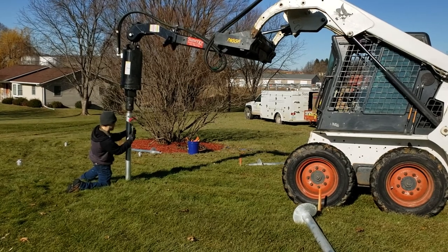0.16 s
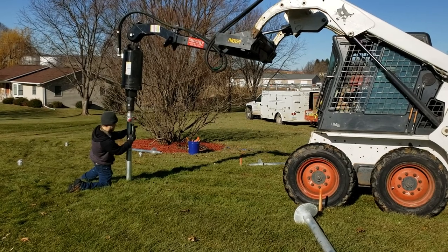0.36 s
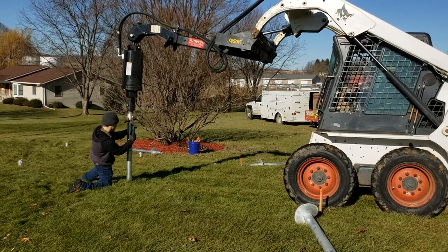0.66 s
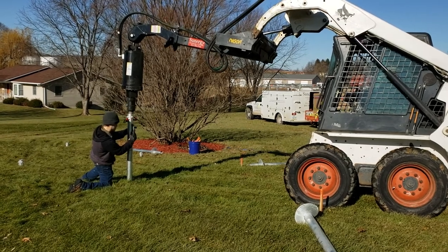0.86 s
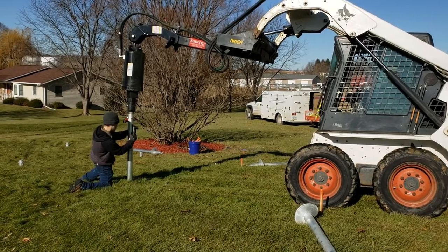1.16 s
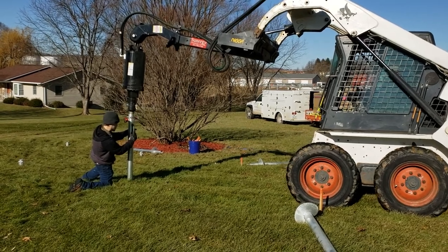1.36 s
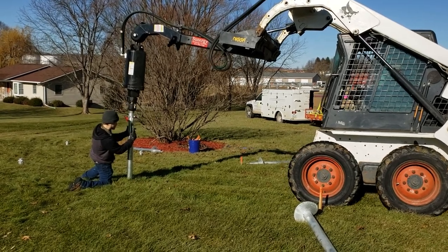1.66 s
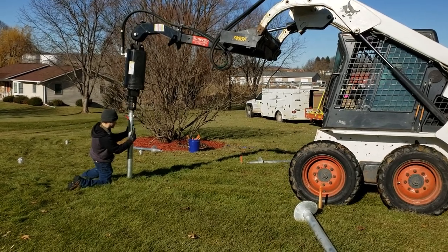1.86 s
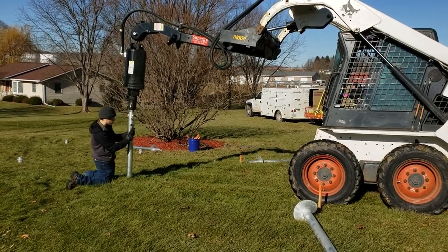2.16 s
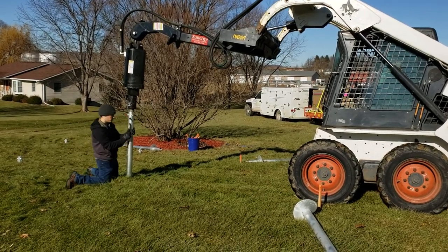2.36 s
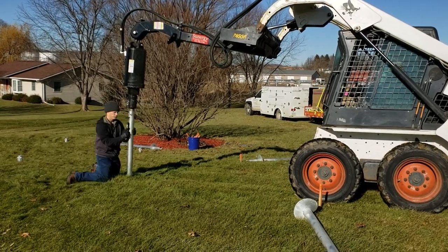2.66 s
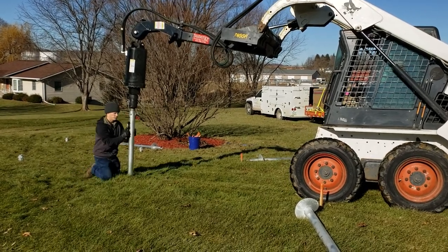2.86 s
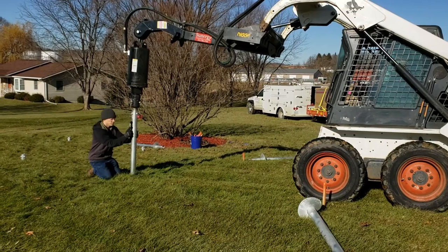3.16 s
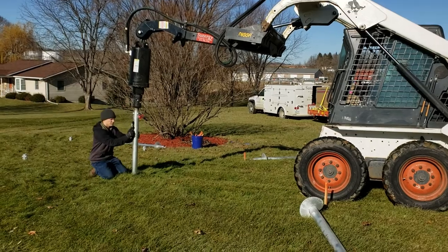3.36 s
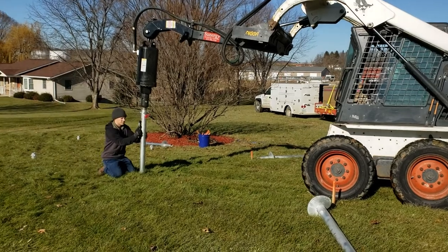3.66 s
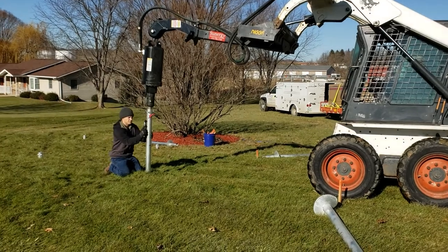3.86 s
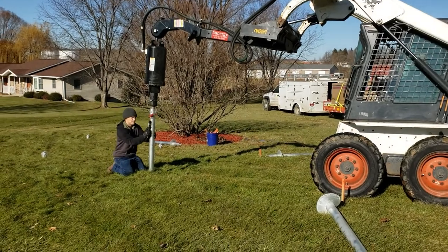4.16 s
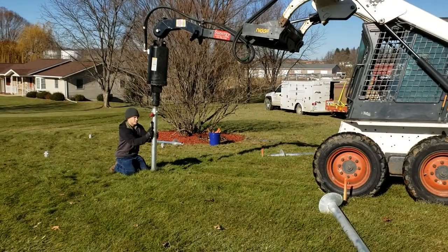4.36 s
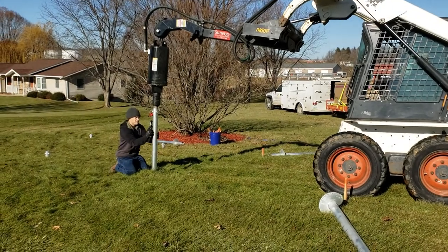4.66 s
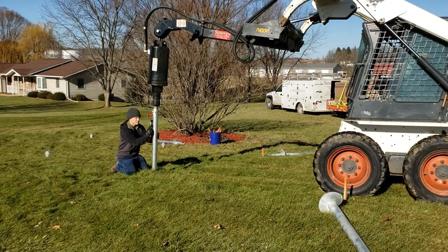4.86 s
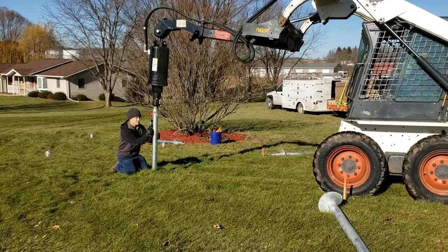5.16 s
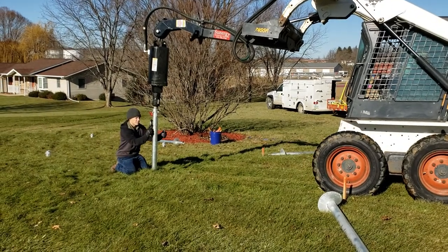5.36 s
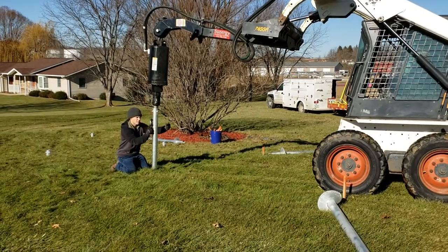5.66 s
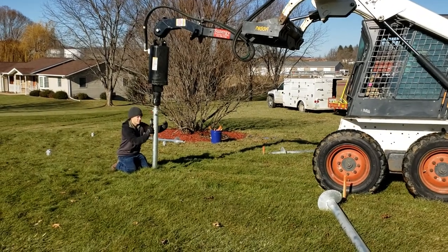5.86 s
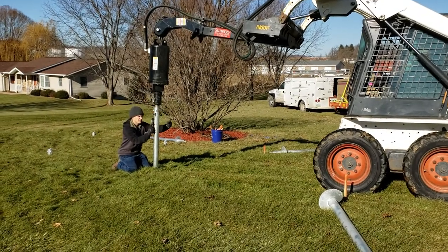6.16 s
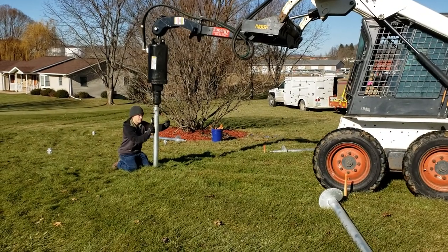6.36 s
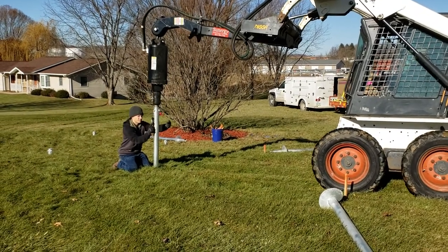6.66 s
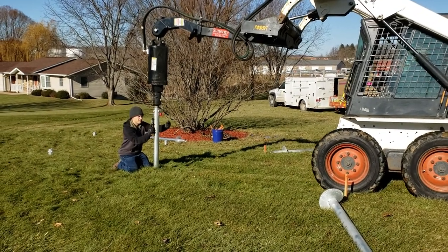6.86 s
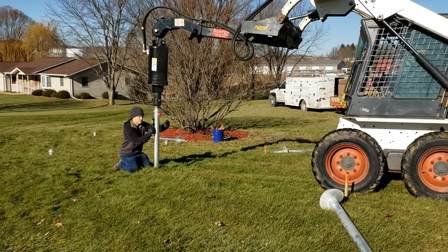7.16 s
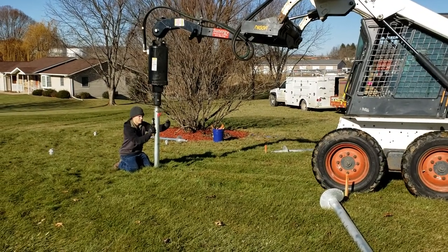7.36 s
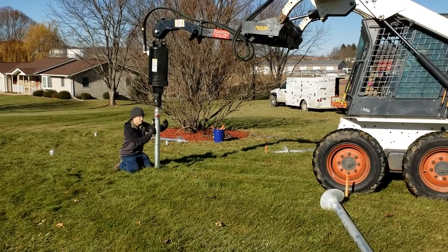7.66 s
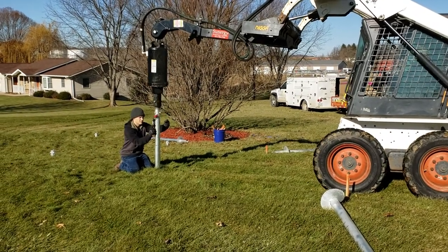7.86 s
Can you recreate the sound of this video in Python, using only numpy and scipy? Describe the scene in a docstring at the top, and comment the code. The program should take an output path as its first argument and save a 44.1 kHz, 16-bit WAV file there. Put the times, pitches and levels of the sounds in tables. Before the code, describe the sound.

A small diesel loader drones steadily while driving a hydraulic auger, with clatter, a growing metallic rattle and light wind rumble.

```python
"""Skid-steer loader on a lawn

A four-cylinder diesel, off to the right, holds about 2180 rpm to drive a hydraulic auger.
The exhaust booms at the firing rate, a panel barks once per cycle, the block clatters, the fan hums.
Oil hisses in the valves. At 3.2 s the tone shifts: a high hiss drops in pitch, a metallic rattle grows.
Wind gusts rumble on the camera's two microphones."""
import sys
import numpy as np
from scipy.fft import rfft, irfft, next_fast_len
from scipy.io import wavfile
from scipy.ndimage import map_coordinates

SR = 44100
rng = np.random.default_rng(int(sys.argv[2]) if len(sys.argv) > 2 else 0)


def store_pcm(level_fs):
    """Save levels as 16-bit WAV."""
    pcm = np.round(np.clip(level_fs, -1, 1) * 32767).astype(np.int16)
    wavfile.write(sys.argv[1], SR, np.atleast_2d(pcm).T)


N = 352800
TIME_S = np.arange(N) / SR
COLOUR_SHIFT_S = 3.2  # the machine's tone changes

# machine noise, left to right: f/Hz, coherence
MACHINE_COHERENCE = [(100, 0.71), (600, 1), (1500, 0.74), (2500, 0.86), (3300, 0.5), (5000, 0.7),
                     (6500, 0.27), (14000, 0.29)]


def amp(db):
    return 10 ** (np.asarray(db) / 20)


def unit(x):
    return x / np.sqrt(np.mean(x ** 2) + 1e-20)


def over_log_f(points, hz):
    f, values = np.transpose(points)
    return np.interp(np.log(hz + 1), np.log(f + 1), values)


def over_time(points):
    return np.interp(TIME_S, *np.transpose(points))


def ramp(middle_s, length_s):
    return .5 + .5 * np.tanh(4 * (TIME_S - middle_s) / length_s)


def wobble(rate_hz):
    """Smooth random curve through unit-variance knots."""
    knots = rng.standard_normal(int(N * rate_hz / SR) + 4)
    grid = np.arange(0, N, 64)
    return np.interp(np.arange(N), grid, map_coordinates(knots, [grid * rate_hz / SR]))


def filtered(x, response):
    """Apply a complex frequency response."""
    size = next_fast_len(N + SR // 2)
    return irfft(rfft(x, size) * response(np.fft.rfftfreq(size, 1 / SR)), size)[..., :N]


def resonance(hz, centre_hz, width_hz):
    return 1j * hz * width_hz / (centre_hz ** 2 - hz ** 2 + 1j * hz * width_hz)


def resonate(x, modes):
    """Parallel modes, each squared to keep the valleys between them deep."""
    return filtered(x, lambda hz: sum(amp(db) * resonance(hz, f, width) ** 2 for f, width, db in modes))


def stereo(pair, spectrum, coherence=MACHINE_COHERENCE):
    """Two independent noises to coloured, partly coherent left and right; rms 1."""
    def response(hz):
        angle = np.arccos(np.clip(over_log_f(coherence, hz), -1, 1)) / 2
        return amp(over_log_f(spectrum, hz)) * [np.cos(angle), np.sin(angle)]
    mid, side = filtered(pair, response)
    return unit(np.array([mid + side, mid - side]))


def harmonics(turns, orders):
    """Harmonics of a rotation; 0 dB is rms 1."""
    return np.sqrt(2) * sum(amp(db) * np.cos(2 * np.pi * round(k) * turns) for k, db in orders)


def cyclic_noise(cycle, share, size=2400):
    """Two noises; a share of their power repeats every engine cycle."""
    patterns = rng.standard_normal((2, size))
    repeating = np.array([map_coordinates(row, [cycle % 1 * size], mode="grid-wrap") for row in patterns])
    return np.sqrt(share) * repeating + np.sqrt(1 - share) * rng.standard_normal((2, N))


def exhaust(cycle, flutter_db):
    """The silencer passes the low firing harmonics; unequal cylinders add weak lines between."""
    # exhaust lines: cycle order (4 = firing rate), level/dB
    orders = [(3, -34), (4, 0.5), (5, -27.5), (8, -12.5), (11, -48.5), (12, -28), (13, -38), (15, -29.5)]
    return harmonics(cycle, orders) * amp(flutter_db * wobble(25))


def panel_bark(cycle, at_cycles, width_cycles, scatter_db, jitter_rad, rebound_db, buzz_db):
    """Shaken once a cycle, a panel bursts on its main mode, rebounds and buzzes in between."""
    # panel modes, main first: f/Hz, width/Hz, level/dB
    modes = [(557.3, 89, 0), (654, 19, -3), (810.6, 36, -9.5)]
    count = cycle - at_cycles + 1.5
    strength, phase = rng.standard_normal((200, 2))[count.astype(int)].T
    offset_cycles = count % 1 - .5
    offset_s = offset_cycles / (np.gradient(cycle) * SR)
    burst = np.exp(-.5 * (offset_cycles / width_cycles) ** 2)
    rebound = amp(rebound_db) * np.exp(-.5 * ((offset_cycles - .27) / .023) ** 2)
    envelope = (burst + rebound) * amp(scatter_db * strength)
    note = envelope * np.sin(2 * np.pi * modes[0][0] * offset_s + jitter_rad * phase)
    buzz = resonate(rng.standard_normal(N), modes) * (1 - .5 * burst)  # gives way under hard drive
    return unit(note) + amp(buzz_db) * unit(buzz)


def fan(firing, flutter_db, waver_turns, blades_per_firing=5.338):
    """The belt-driven fan hums in step with the crank; turbulence makes it waver."""
    # fan hum: blade-rate order, level/dB
    orders = [(1, -2.5), (2, -11)]
    blade_turns = blades_per_firing * firing + waver_turns * wobble(24)
    return harmonics(blade_turns, orders) * amp(flutter_db * wobble(8.6))


def block_clatter(firing, depth):
    """Combustion roars through the block, swelling slightly at each firing."""
    # block noise: f/Hz, density/dB
    spectrum = [(120, 4), (220, 3), (340, -1.5), (680, 3.5), (920, -3.5), (1400, -4), (2050, -1),
                (2600, -10.5), (2900, -11.5), (3200, -18.5), (3850, -13.5), (5200, -17), (6600, -31.5),
                (9000, -41)]
    swell = 1 + depth * np.cos(2 * np.pi * firing)
    return stereo(rng.standard_normal((2, N)) * swell, spectrum)


def valve_ticks(cycle, decay_cycles, scatter_db):
    """Valves and injectors tick with a similar ring every cycle."""
    # ticks: position/cycles, level/dB
    ticks = [(0.081, -1.5), (0.219, 0), (.35, 3), (.41, -4.5), (.64, 1), (0.741, -1.5), (0.829, -16),
             (.91, 0.5)]
    # ring of the ticks: f/Hz, density/dB
    spectrum = [(700, -19.5), (1050, 3.5), (1450, -5), (2100, -0.5), (2600, -9), (3200, -15), (4500, -14),
                (6600, -25.5), (9000, -53.5)]
    envelope = 0
    for at_cycles, db in ticks:
        count = cycle - at_cycles + 1
        tick_db = db + scatter_db * rng.uniform(-2.5, 1, size=200)[count.astype(int)]
        envelope = envelope + amp(tick_db) * np.exp(-(count % 1) / decay_cycles)
    return stereo(cyclic_noise(cycle, share=0.74) * envelope, spectrum)


def sheet_metal(x):
    """Ringing covers and guards lift or cut narrow bands."""
    # sheet-metal modes: f/Hz, width/Hz, gain/dB
    modes = [(1444, 54, 3.5), (1727, 66, -6.5), (2180, 83, 1), (2780, 53, 9), (4900, 180, 3),
             (5640, 260, 4.5)]
    return filtered(x, lambda hz: 1 + sum((amp(db) - 1) * resonance(hz, f, bw) for f, bw, db in modes))


def ringing_rattle(shift, before_db, after_db, contacts_per_s, scatter_db):
    """Small, uneven contacts ring metallically at 2-4 kHz, louder after the colour shift."""
    # rattle modes: f/Hz, width/Hz, level/dB
    modes = [(2054, 120, -3.5), (2318, 210, -1.5), (2793, 70, -1.5), (3865, 130, -8.5)]
    level_db = before_db + (after_db - before_db) * shift + 0.85 * wobble(12)
    contacts = (rng.random(N) < contacts_per_s / SR) * rng.choice([-1, 1], size=N)
    strength = amp(scatter_db * rng.standard_normal(N).clip(-2, 2))
    return amp(level_db) * unit(resonate(contacts * strength, modes))


def gear_whine(cycle, flutter_db, waver_cycles):
    """Gears and pump whine in crank-locked lines, each fading on its own."""
    # whine lines: cycle order, level/dB
    orders = [(44, -3), (47, -7), (68, -3), (75, -1), (77, -15.5), (81, 0), (93, -9.5), (96, 2), (108, -8),
              (115, -4)]
    return sum(harmonics(cycle + waver_cycles * wobble(7.7), [line]) * amp(flutter_db * wobble(4.6))
               for line in orders)


def early_bands(shift, swell_s, start_db, swell_db, end_db):
    """Machine noise near 1.4 and 4.3 kHz swells, then fades at the colour shift."""
    # noise bands: f/Hz, density/dB
    spectrum = [(800, -17.5), (1250, 6.5), (1450, 14), (1800, -4.5), (2300, -24), (3300, -16), (4300, 1),
                (4900, -2.5), (6200, -32), (9000, -31)]
    early_db = start_db + (swell_db - start_db) * ramp(swell_s, length_s=.4)
    level_db = early_db + (end_db - early_db) * shift
    return amp(level_db) * stereo(rng.standard_normal((2, N)), spectrum)


def oil_hiss(flutter_db):
    """Oil hisses through the valves and the auger motor."""
    # fine hiss: f/Hz, density/dB
    spectrum = [(3000, -37), (6500, -18), (8000, -6), (9300, -2.5), (10300, -5), (11800, 3), (14200, 3),
                (15700, 3.5)]
    return stereo(rng.standard_normal((2, N)) * amp(flutter_db * wobble(60)), spectrum)


def high_hiss(shift, before_hz, after_hz, width_hz, peak_db, fade_db_per_s):
    """A narrow hiss, loudest at the colour shift, where it crossfades to a lower band."""
    def band(centre_hz):
        noise = rng.standard_normal((2, N))
        return unit(filtered(noise, lambda hz: 1 / (1 + (2 * (hz - centre_hz) / width_hz) ** 2)))
    level_db = peak_db - fade_db_per_s * np.abs(TIME_S - COLOUR_SHIFT_S)
    return amp(level_db) * (np.sqrt(1 - shift) * band(before_hz) + np.sqrt(shift) * band(after_hz))


def wind_strength(fresh_db, light_db, flutter_offset_db):
    """Rumble and flutter amplitudes: bell-shaped gusts over an unsteady, easing breeze."""
    # gusts: peak t/s, length/s, rumble/dB, flutter/dB
    gusts = [(0.043, 0.051, -27, -43.5), (0.17, .07, -25.5, -34.5), (0.33, .06, -15.5, -30),
             (0.445, .09, -29.5, -28.5), (0.557, .06, -23, -32.5), (1.435, 0.16, -25.5, -31.5),
             (1.568, 0.087, -19.5, -32), (1.655, .07, -20.5, -29), (2.385, .07, -27, -39.5),
             (2.786, 0.087, -28, -51), (3.048, .17, -23, -36.5), (4.652, 0.093, -28.5, -41),
             (5.895, 0.24, -27.5, -53.5), (6.032, 0.11, -26, -44), (6.524, 0.088, -24.5, -44),
             (6.768, 0.27, -28.5, -41.5)]
    breeze_db = fresh_db + (light_db - fresh_db) * ramp(middle_s=2.2, length_s=1.4) + 1.1 * wobble(9)
    power = amp([breeze_db, breeze_db + flutter_offset_db]) ** 2
    for peak_s, length_s, rumble_db, flutter_db in gusts:
        bell = np.exp(-2 * (2 * (TIME_S - peak_s) / length_s) ** 2)
        power = power + amp([[rumble_db], [flutter_db]]) ** 2 * bell
    return np.sqrt(power)


def wind(rumble, flutter, lump_db):
    """Eddies hit each microphone as a low rumble; the sharpest flutter higher up."""
    # rumble: f/Hz, density/dB
    rumble_spectrum = [(10, -33), (22, -26), (45, -0.5), (70, 3.5), (110, -1.5), (170, -8.5), (300, -23.5),
                       (800, -45), (2500, -79.5)]
    # flutter: f/Hz, density/dB
    flutter_spectrum = [(60, -23.5), (160, 3.5), (260, 0), (460, -5), (700, -13.5), (1100, -17.5),
                        (3000, -53.5)]
    # wind, left to right: f/Hz, coherence
    coherence = [(60, 0.95), (130, 0.32), (400, 0.25)]
    lumps = amp(lump_db * np.array([wobble(40), wobble(40)]))
    eddies = lambda spectrum: unit(lumps * stereo(rng.standard_normal((2, N)), spectrum, coherence))
    return rumble * eddies(rumble_spectrum) + flutter * eddies(flutter_spectrum)


def microphones(hz):
    """The camera body delays and shades the left microphone, which faces away from the engine."""
    # body shadow: f/Hz, left minus right/dB
    shadow = [(140, 0), (330, -2), (4000, -1.3), (9000, -2), (13000, -4.5)]
    # diffraction round the body: f/Hz, left lag/rad
    diffraction = [(0, -28.5), (72, 0.22), (145, 0.29), (390, 0.92), (800, 1.5), (1800, 3), (2300, 4),
                   (2650, 4), (3100, 1.5), (3450, -1), (3700, 1.5), (4000, 1.36), (4900, 3), (6200, 4),
                   (12000, 4.5), (15500, 9.5)]
    shadow_db = over_log_f(shadow, hz)
    lag_rad = np.interp(hz, *np.transpose(diffraction))
    return np.array([amp(side * shadow_db / 2) * np.exp(-.5j * side * lag_rad) for side in (1, -1)])


def scene():
    """The machine's parts, mixed relative to its overall level, plus wind."""
    # engine speed: t/s, firing rate/Hz
    firing_rate = [(0.0, 72.282), (0.6, 72.548), (1.2, 72.155), (2.0, 72.49), (3.0, 72.632), (4.5, 72.646),
                   (6.2, 72.649), (6.7, 72.845), (7.4, 72.836), (8.0, 72.144)]
    # overall machine loudness, rising about 6 dB over the first 3 s: t/s, level/dB
    level = [(0, -40.5), (1, -42), (1.9, -38), (2.5, -38), (3.15, -35.5), (4.7, -36), (8, -37)]
    firing = np.cumsum(over_time(firing_rate)) / SR + .119
    cycle = firing / 4
    shift = ramp(COLOUR_SHIFT_S, length_s=0.46)
    since_shift_s = np.maximum(TIME_S - COLOUR_SHIFT_S, 0)

    rumble, flutter = wind_strength(fresh_db=-29.5, light_db=-37.5, flutter_offset_db=-7.5)
    # exhaust and fan dip and waver in loud wind
    threshold_db = -22 + 4 * wobble(22)
    duck = 1 / np.sqrt(1 + (rumble ** 2 + flutter ** 2) / amp(threshold_db) ** 2)
    # both grow slowly after the shift
    exhaust_db, bark_db = 16.5 + 0.64 * since_shift_s, -1.56 + 0.1 * since_shift_s

    clatter = amp(-0.76) * block_clatter(firing, depth=0.077)
    ticks = amp(-10.5) * valve_ticks(cycle, decay_cycles=0.077, scatter_db=4)
    machine = sheet_metal(clatter + ticks)
    machine += amp(bark_db) * panel_bark(cycle, at_cycles=.6, width_cycles=0.081, scatter_db=0.63,
                                         jitter_rad=0.17, rebound_db=-5, buzz_db=-2)
    machine += amp(1.28) * duck ** 0.71 * fan(firing, flutter_db=0.6, waver_turns=0.0088)
    machine += amp(-15.5) * gear_whine(cycle, flutter_db=3, waver_cycles=0.00046)
    machine += amp(-19.5) * oil_hiss(flutter_db=1.5)
    machine += high_hiss(shift, before_hz=14400, after_hz=13200, width_hz=1300,
                         peak_db=-29.5, fade_db_per_s=1)
    machine += early_bands(shift, swell_s=1.3, start_db=-15.5, swell_db=-11.5, end_db=-28)
    machine += ringing_rattle(shift, before_db=-19, after_db=-12.5, contacts_per_s=500, scatter_db=4.5)
    machine += amp(exhaust_db) * duck * exhaust(cycle, flutter_db=-0.5)
    machine *= amp(over_time(level))
    return filtered(machine, microphones) + wind(rumble, flutter, lump_db=2.0)


def record(dry):
    """Brick-wall low-pass at the camera's band limit."""
    return filtered(dry, lambda hz: hz < 15720)


dry = scene()
out = record(dry)
store_pcm(out)
```